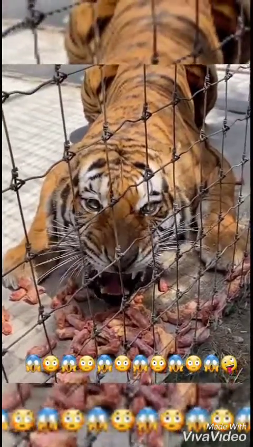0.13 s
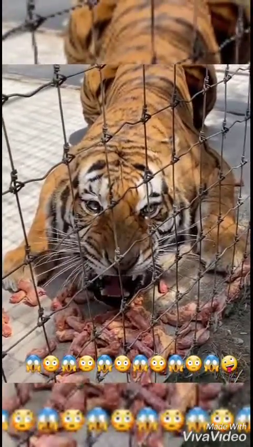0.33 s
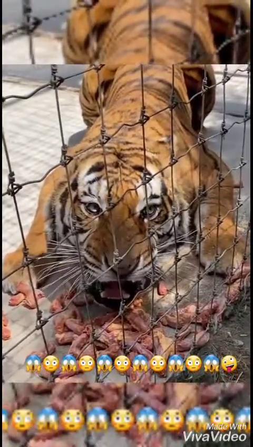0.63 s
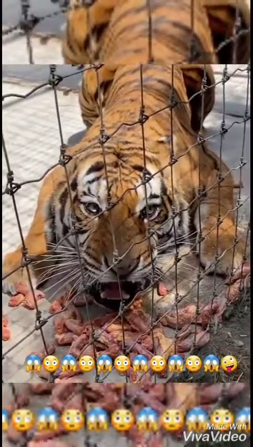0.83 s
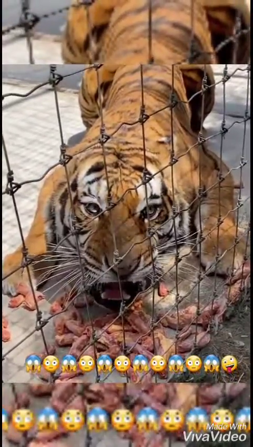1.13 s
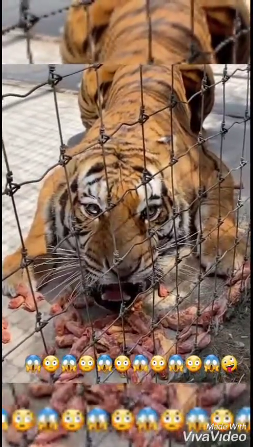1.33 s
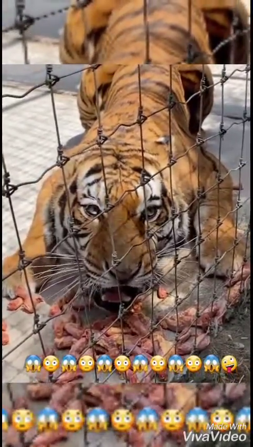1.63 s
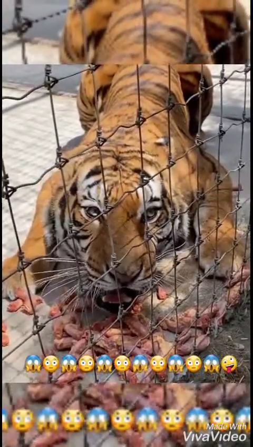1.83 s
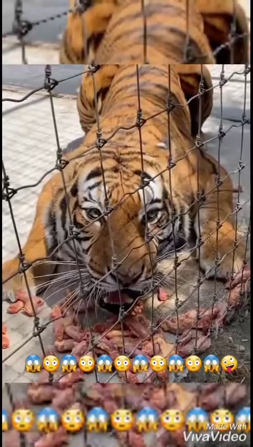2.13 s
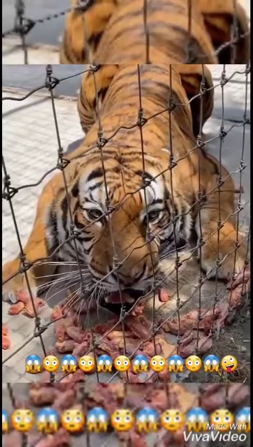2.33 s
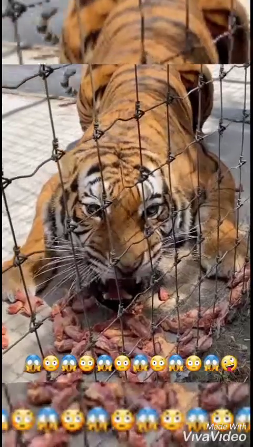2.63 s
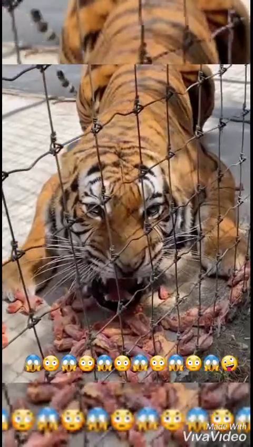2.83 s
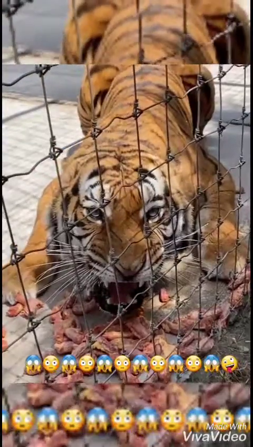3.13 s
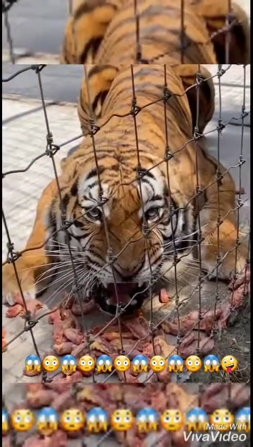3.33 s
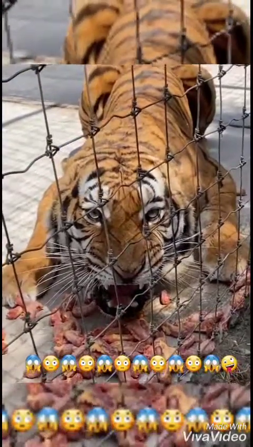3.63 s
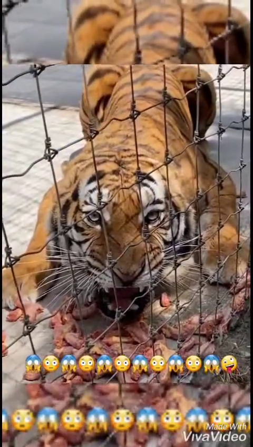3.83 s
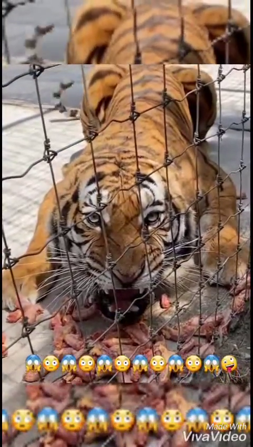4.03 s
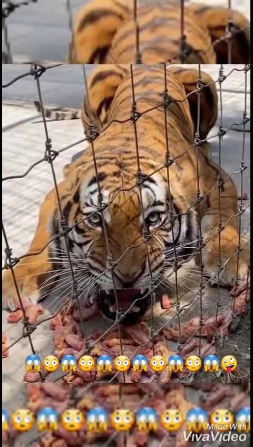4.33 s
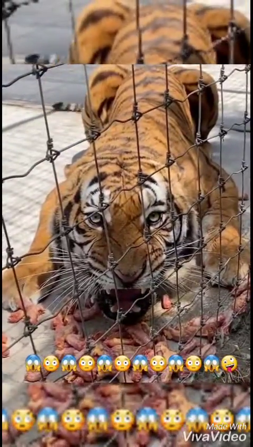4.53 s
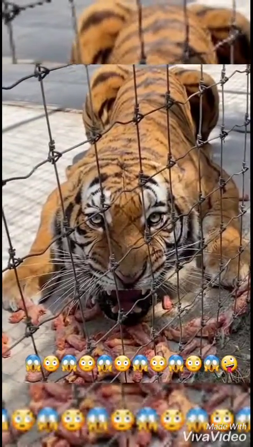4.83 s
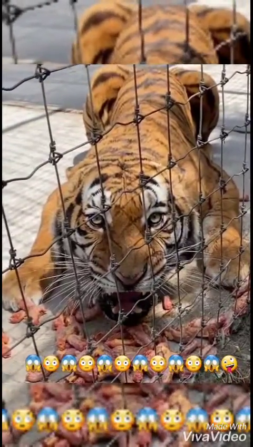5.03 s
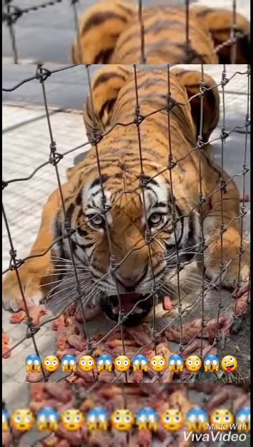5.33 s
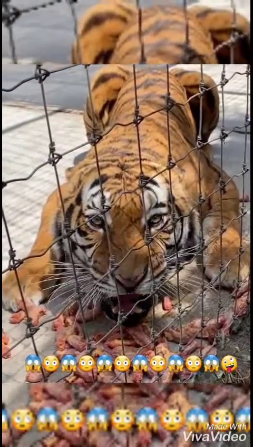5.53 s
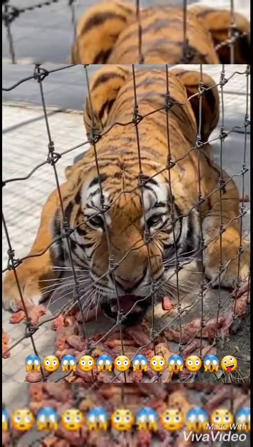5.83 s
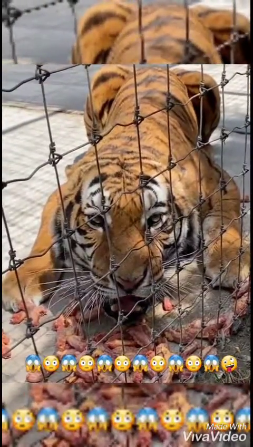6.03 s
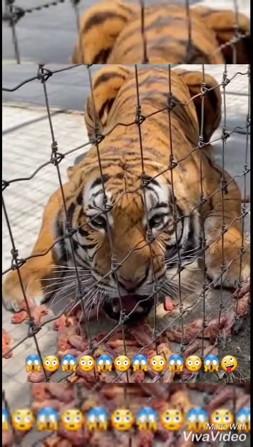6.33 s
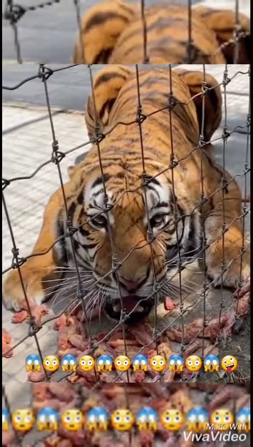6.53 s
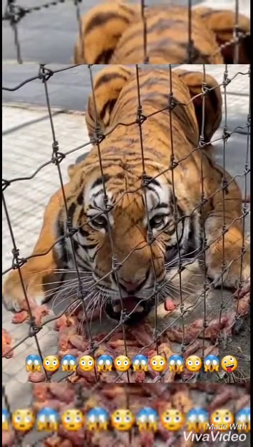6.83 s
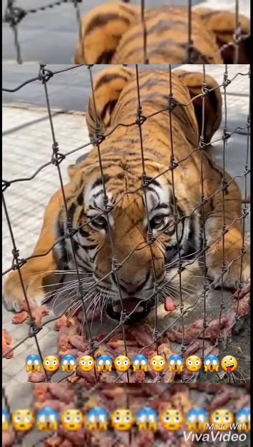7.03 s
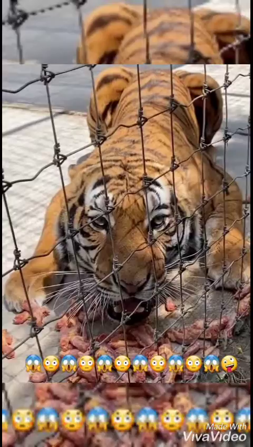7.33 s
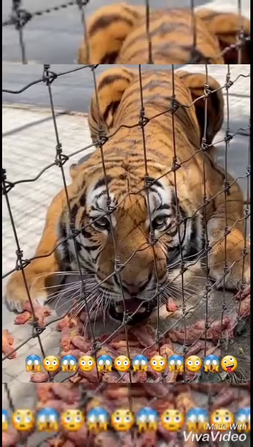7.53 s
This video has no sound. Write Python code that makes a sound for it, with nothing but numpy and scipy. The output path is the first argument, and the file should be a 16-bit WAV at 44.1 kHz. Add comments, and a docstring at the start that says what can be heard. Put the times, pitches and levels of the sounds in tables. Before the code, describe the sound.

A tiger is snarling close to the microphone in a quiet open-air enclosure, its voice rough and fluttering, with a chesty rumble and a rasp of air. The first snarl fades into soft croaks by about 1.7 seconds. A short growl at 1.8 seconds slows into a rattling run of throaty knocks. At 2.6 seconds a much louder snarl breaks out, peaks near 3 seconds and slowly sinks, ending in croaks and a faint moan around 5.3 seconds. A deep growl follows at 5.4 seconds and slows to knocks near 6 seconds. At 6.2 seconds the tiger roars with a hoarse moan on top, loudest around 6.6 seconds, then eases into a darker, softer rasp until about 7.7 seconds. A distant bird chirps very faintly in the lulls near 1.6 and 5 seconds.

```python
"""An open-air enclosure with a concrete floor: close to the microphone, behind a wire fence, a tiger
snarls over raw meat. Its heavy vocal folds flap about 20-60 times a second; each flap thumps the chest,
rings the throat and lets a puff of air rasp past the teeth. Effort and flap rate set loudness, roughness
and colour, and the jaws close as a snarl fades. Snarls run down into soft croaks, growls slow to single
knocks, and a hoarse moan rides on the final roar. Far off, a bird chirps faintly in the lulls."""
import sys
import numpy as np
from scipy import signal
from scipy.fft import rfft, irfft, next_fast_len
from scipy.io import wavfile
from scipy.ndimage import map_coordinates

SR = 44100
rng = np.random.default_rng(int(sys.argv[2]) if len(sys.argv) > 2 else 0)


def int16_out(signal):
    """Quantize to a 16-bit WAV file."""
    q = np.round(np.clip(np.atleast_2d(signal).T, -1, 1) * 32767)
    wavfile.write(sys.argv[1], SR, q.astype(np.int16))


N = 339112

# resonances of the tiger's airway: (centre [Hz], width [Hz], level [dB])
PHARYNX = [(159.6, 42.6, 0)]
SNARL_THROAT = [(266, 165, -3), (395, 150, -4), (514, 116, -5.5), (640, 120, -13), (705, 85, -5.5),
                (754, 33, -3.5), (912, 32.4, -6.5)]
GROWL_THROAT = [(260, 130, 0), (420, 155, 6.5), (730, 105, 4.5), (914, 19, -5)]
GROWL_MOUTH = [(1274, 260, -2), (1806, 420, -1), (1990, 240, -2), (2360, 270, -9), (2880, 610, -14.5),
               (3400, 700, -16), (5140, 2860, -28), (12600, 3300, -39.5)]

EASY_DB, EASY_RATE_HZ, EASY_ROUGH = -35, 35, .3  # effort, flap rate and roughness of an easy snarl


def snarls():
    """The tiger at close range: two long snarls and a roar, with a short growl ahead of the last two."""
    # gestures: (time [s], effort [dB], flap rate [Hz])
    first_snarl = [(0.0, -33, 41), (.45, -35.5, 36.1), (0.87, -38, 35.3), (1.298, -43.5, 29.8),
                   (1.388, -46.5, 27.1), (1.518, -45, 20.3), (1.8, -55.5, 21.4)]
    soft_growl = [(1.8, -44.5, 55.6), (1.898, -32.5, 55.84), (1.978, -40, 36.4), (2.1, -47.5, 29.26)]
    long_snarl = [(2.6, -44.5, 50.7), (2.71, -25, 44.4), (2.81, -22.5, 56.5), (2.92, -21, 56.7),
                  (3.06, -22.5, 52.5), (3.22, -25, 48.2), (3.52, -30.5, 41.6), (3.66, -28, 37.1),
                  (3.85, -31.5, 37.1), (4.4, -36, 32.9), (4.76, -44, 27), (5.2, -53, 22), (5.35, -71, 15)]
    deep_growl = [(5.411, -32, 66.73), (5.49, -27, 80.47), (5.56, -27.5, 56.4), (5.67, -30.5, 51.6),
                  (5.75, -25, 46.85), (5.84, -33, 40.64), (5.93, -32, 36.93)]
    roar = [(6.21, -38, 37.56), (6.296, -27.5, 45.65), (6.4, -21, 49.27), (6.558, -19, 37.01),
            (6.7, -21, 39.64), (6.86, -28, 39.58), (6.988, -33, 34.26), (7.482, -37, 33.1),
            (7.69, -39.5, 29.42)]
    out = np.zeros(N)
    # (gesture, teeth bared, offsets of chest [dB], boom [dB], rasp [dB], hiss [dB])
    for gesture, bared, *colour_db in [(first_snarl, True, 3, -1.9, -5, -15),
                                       (soft_growl, False, 5.5, -1, -.89, -56),
                                       (long_snarl, True, 4.16, -6.5, -4, -13.5),
                                       (deep_growl, False, 3.4, 1.9, -7.3, -28.5),
                                       (roar, True, 1.8, -1.8, -5, -19)]:
        add(out, gesture[0][0], outburst(gesture, bared, colour_db))
    return out


def outburst(gesture, bared, colour_db):
    """One snarl, growl or roar: the same flaps drive chest, pharynx, throat, mouth and a high hiss."""
    # resonances: (centre [Hz], width [Hz], level [dB])
    chest_modes = [(53.4, 29.4, 7), (88.7, 23, 2.5), (112.6, 41.4, 6.5)]
    hollow_throat = [(762.3, 43, 0)]
    clear_throat = [(283.3, 32, 3), (337, 53, 0), (400, 43, -3.5)]
    t = np.arange(int(gesture[0][0] * SR), min(N, int(gesture[-1][0] * SR))) / SR
    effort_db, rate = curves(gesture, t)
    rough, double = folds(effort_db, rate)
    chest_db, boom_db, throat_db, rasp_db, hiss_db = levels(t, effort_db, rough, bared, colour_db)
    locked = np.interp(rate, [43, 50], [0, 1])  # from 43 to 50 Hz the folds lock into a regular beat
    wash_db = np.interp(rate, [22.2, 26.6], [-5, 0])  # the steady voice drops as slow flaps come apart
    chaos = rough * (1 - .7 * locked)
    flaps = flap_train(t, rate, chaos, double, jitter=.14, scatter=.7)
    # each closure cuts the flow and leaves a dip in pressure; roughness trades it for turbulence
    deep = blend(-flaps, puffs(flaps, open_s=.006, linger_s=.008, leak=.6), .6 * chaos)
    voice = blend(-flaps, puffs(flaps, open_s=.0045, linger_s=.005, leak=.5), .3 + 1.1 * chaos)
    mouth = mouth_rasp(t, flaps, locked, rough, bared)
    hiss = amp(hiss_db) * high_hiss(flaps)
    ring = lambda source, modes: steady(through(source, cavity(modes)))
    chest = amp(chest_db + wash_db) * ring(deep, chest_modes)
    boom = amp(boom_db + wash_db / 2) * ring(deep, PHARYNX)
    throat = ring(voice, SNARL_THROAT if bared else GROWL_THROAT)
    softness = np.clip((-30 - throat_db) / 40, 0, .28)  # a soft voice brings out the hollow upper throat
    throat = wavering(blend(throat, ring(voice, hollow_throat), softness))
    if bared:  # regular flaps ring clean harmonics
        throat = blend(throat, ring(-flaps, clear_throat), .3 * locked)
    throat = amp(throat_db + wash_db) * throat
    rasp = amp(rasp_db + wash_db) * steady(wavering(mouth))
    fade = np.clip(np.minimum(t - t[0], t[-1] - t) / .00051, 0, 1)
    return fade * (chest + boom + throat + rasp + hiss)


def folds(effort_db, rate, rough_per_db=.04, rough_per_octave=.65, split_below_hz=48):
    """Effort that the flap rate cannot take up makes the folds rough; slow cycles grow a second flap."""
    strain = rough_per_db * (effort_db - EASY_DB)
    relief = rough_per_octave * np.log2(rate / EASY_RATE_HZ)
    double = 1 - rate / split_below_hz
    return np.clip([EASY_ROUGH + strain - relief, double], .1, 1)


def levels(t, effort_db, rough, bared, colour_db, jaws_open_db=-31.5, jaws_shut_db=-47):
    """Levels (dB) of chest, boom, throat, rasp and hiss as an outburst swells and the jaws close."""
    # chest to rasp respond to (effort [dB per dB], roughness [dB per unit], closed jaws [dB])
    chest_law = (1.1, -9, 2.7)
    boom_law = (0.99, 6.6, 3)
    throat_law = (0.99, 0, 1)
    rasp_law = (0.97, -0.83, -9)
    # the high hiss drops away in the loudest part of the roar:
    # (effort [dB per dB], drop [dB per unit], closed jaws [dB])
    hiss_law = (1.16, -29, -27.5)
    age = t - t[0]
    slack = np.interp(effort_db, [jaws_shut_db, jaws_open_db], [1, 0])
    closed = slack * age / age[-1] if bared else 0
    chest, boom, throat, rasp, hiss = [
        EASY_DB + grows * (effort_db - EASY_DB) + shift_db * (rough - EASY_ROUGH) + closed_db * closed
        for grows, shift_db, closed_db in (chest_law, boom_law, throat_law, rasp_law, hiss_law)]
    swell_db = 0 if bared else np.interp(age, [0, .1], [-30, 0])  # a growl swells in
    follow_db = .26 * swell_db
    chest_db, boom_db, rasp_db, hiss_db = colour_db
    return (chest + chest_db + swell_db, boom + boom_db + swell_db, throat + follow_db,
            rasp + rasp_db + follow_db, hiss + hiss_db + swell_db)


def flap_train(t, rate, rough, double, jitter, scatter):
    """One impulse per flap, uneven in time and size when rough; a second flap splits the cycle."""
    phase = np.cumsum(rate) / SR
    beats = np.arange(1, int(2 * phase[-1]) + 1)
    at = np.minimum(np.searchsorted(phase, beats / 2), len(t) - 1)
    luck = rng.uniform(-1, 1, (len(at), 2))
    size = np.where(beats % 2, 1, double[at]) * (1 + scatter * rough[at] * luck[:, 0])
    when = at + SR * jitter * rough[at] * luck[:, 1] / rate[at]
    power = rate[at] * (1 + double[at] ** 2)  # faster flaps share the same air
    return np.bincount(np.clip(when, 0, len(t) - 1).astype(int), size / np.sqrt(power), len(t))


def airflow(t, open_s, linger_s):
    """Flow through one opening of the folds at t = 0: a round rise and fall."""
    return np.exp(-.5 * (t / np.where(t < 0, open_s, linger_s)) ** 2)


def puffs(flaps, open_s, linger_s, leak):
    """Turbulent air let through in a puff at every flap, over a steady leak."""
    t = np.arange(-(SR // 20), SR // 20) / SR
    flow = unit(signal.fftconvolve(flaps, airflow(t, open_s, linger_s), "same"))
    return unit((flow + leak) * rng.standard_normal(len(flaps)))


def mouth_rasp(t, flaps, locked, rough, bared):
    """A narrow mouth clicks dully; a bared one hisses brightly and darkens as the lips come forward."""
    # resonances: (centre [Hz], width [Hz], level [dB])
    wide_mouth = [(1354, 116, 0.5), (1747, 474, -0.5), (1991, 212, 3), (2405, 270, -8.5), (2974, 275, -2.5),
                  (3376, 205, 1.5), (3639, 265, -2), (4450, 173, -6), (5100, 900, -10.5)]
    pursed_mouth = [(1235, 220, -1.5), (1570, 460, -6.5), (1990, 270, 4), (2385, 226, 1), (3577, 440, -1.5),
                    (4260, 230, -6.5), (5640, 770, -12.5), (7080, 730, -17.5)]
    # lips pushed forward: (time [s], share [0-1])
    pursing = [(6.3, 0.18), (6.8, 0.67), (7.0, 0.94)]
    snaps = wet_cracks(flaps, locked)
    if not bared:
        return ring_mouth(flaps, snaps, locked, GROWL_MOUTH, open_s=.0038, leak=.19)
    wide, pursed = [ring_mouth(flaps, snaps, locked, modes, open_s=.0047, leak=.08 + .7 * rough)
                    for modes in (wide_mouth, pursed_mouth)]
    return blend(wide, pursed, curves(pursing, t)[0])


def ring_mouth(flaps, snaps, locked, modes, open_s, leak):
    """Puffs and cracks ring the mouth; wet lips and tongue shift, so each flap favours other modes."""
    uneven = lambda blows: blows * rng.uniform(.4, 1, len(blows))
    out = 0
    for group in (modes[k::3] for k in range(3)):
        breath = puffs(uneven(flaps), open_s, open_s, leak)
        crackle = puffs(uneven(snaps), open_s=.001, linger_s=.002, leak=0)
        air = blend(breath, crackle, share=.24 * (1 + locked))
        out += amp(max(db for hz, width, db in group)) * through(air, cavity(group))
    return out


def wet_cracks(flaps, locked, stray_s=.0085):
    """Two cracks per flap: one sharp snap when the folds are locked, a ragged pair when they are slack."""
    at = np.repeat(np.flatnonzero(flaps), 2)
    when = at + SR * stray_s * (1 - locked[at]) * rng.uniform(-1, 1, len(at))
    size = flaps[at] / np.sqrt(1 + locked[at])
    return np.bincount(np.clip(when, 0, len(flaps) - 1).astype(int), size, len(flaps))


def high_hiss(flaps):
    """A high, flickering hiss that pulses with the flaps."""
    # (frequency [Hz], level [dB])
    spectrum = [(3500, 1), (5800, 2), (13000, -0.5), (16000, -22)]
    flicker = puffs(flaps * rng.uniform(.014, 1, len(flaps)), open_s=.0028, linger_s=.004, leak=.017)
    return unit(through(flicker, along(spectrum)))


def wavering(x, depth=.018, rate_hz=14):
    """Tongue and jaws keep moving, so all the resonances waver together in pitch."""
    lead = wobble(len(x), rate_hz) * depth * SR / (2 * rate_hz)
    return map_coordinates(x, [np.arange(len(x)) + lead], mode="nearest")


def knocks():
    """A growl slowed to single flaps: a rasping click, a throat ring, a thud from pharynx and chest."""
    # (time [s], throat [dB], throat pitch [Hz], thud [dB], rasp [dB]), levels before each part's trim
    single_flaps = [(2.076, -30, 381, -31, -42), (2.112, -22, 398, -25, -28.5), (2.145, -30, 400, -26, -32),
                    (2.18, -21.5, 390, -18.5, -33), (2.224, -22.5, 433, -21, -32.5),
                    (2.263, -26.5, 423, -24, -30), (2.306, -23.5, 357, -21, -27.5),
                    (2.344, -23.5, 402, -22.5, -28.5), (2.381, -18.5, 407, -19, -29.5),
                    (2.422, -27, 330, -21, -32), (2.463, -20, 400, -19.5, -32),
                    (2.5, -26.5, 420, -18, -30.5), (2.54, -18.5, 350, -20, -35),
                    (5.936, -27.5, 406, -19, -26.5), (5.966, -22.5, 350, -25.5, -28),
                    (6.0, -26.5, 412, -30, -31), (6.043, -24.5, 402, -24, -37),
                    (6.09, -28, 500, -22.5, -37), (6.131, -24, 430, -26, -39)]
    # pharynx and chest: (centre [Hz], width [Hz], level [dB])
    thud_modes = [(173.5, 54, 1.5), (66, 36, 2)]
    out, t = np.zeros(N), np.arange(SR // 8) / SR - .02
    blow = lambda delay: 1.0 * (np.arange(len(t)) == np.searchsorted(t, delay))
    flow = airflow(t - .005, open_s=.0028, linger_s=.0045) + .12 * airflow(t, open_s=.012, linger_s=.025)
    for s, throat_db, throat_hz, thud_db, rasp_db in single_flaps:
        air = flow * rng.standard_normal((3, len(t)))
        lag, tuning = rng.uniform(.6, 1.4), rng.uniform(.8, 1.2)  # no two closures are alike
        rasp = amp(rasp_db - 15.5) * resonate(air[0], GROWL_MOUTH)
        ring = amp(throat_db - 17) * resonate(blow(.00212), [(throat_hz, 150, 0)])
        ragged = amp(throat_db - 16.5) * resonate(air[1], GROWL_THROAT)
        body = [(hz * tuning, width, db) for hz, width, db in thud_modes]
        thud = amp(thud_db - 11) * resonate(blend(blow(.00782 * lag), air[2], .46), body)
        add(out, s + t[0], rasp + ring + ragged + thud)
    return out


def moans(roughness=.45):
    """A second, hoarse voice bends in pitch over the end of the long snarl and through the roar."""
    # one list per moan: (time [s], pitch [Hz], level [dB])
    gestures = [
        [(4.42, 163, -44), (4.8, 138.4, -44), (5.3, 179.8, -44)],
        [(6.33, 173.3, -35), (6.51, 164.1, -24), (6.7, 178.3, -22), (6.83, 176.6, -34), (7.1, 178, -35)],
    ]
    out = np.zeros(N)
    for gesture in gestures:
        t = np.arange(int(gesture[0][0] * SR), int(gesture[-1][0] * SR)) / SR
        hz, db = curves(gesture, t)
        flutter = 1 + roughness * (wobble(len(t), EASY_RATE_HZ) + 1j * wobble(len(t), EASY_RATE_HZ))
        tone = unit(np.real(flutter * np.exp(2j * np.pi * np.cumsum(hz) / SR)))
        add(out, t[0], amp(db) * signal.windows.tukey(len(t), .1) * tone)
    return out


def grunts():
    """Now and then one resonance of throat or mouth sounds alone, hoarse and sagging a little."""
    # (time [s], pitch [Hz], relative level [dB], length [s])
    hollow_rings = [(.86, 171.8, -30, 0.19), (1.796, 755, -33.5, 0.035), (2.122, 153, -19, .032),
                    (3.653, 508, -25, 0.078), (5.413, 760.6, -26, 0.042), (5.525, 170.6, -15.5, .1),
                    (5.763, 445, -16, 0.02), (6.041, 1947, -22.5, .0063), (6.088, 1850, -24, 0.012),
                    (6.586, 1955, -20, 0.0086)]
    out = np.zeros(N)
    for s, hz, db, length in hollow_rings:
        tone = glide(hz * 1.03, hz * .97, length)
        hoarse = np.hanning(len(tone)) * resonate(rng.standard_normal(len(tone)), [(hz, hz / 5, 0)])
        add(out, s, amp(db) / 2 * blend(tone, hoarse, .42))
    return out


def croaks(gap_s=.0215, second_db=-7.5):
    """As a snarl runs down, slack folds open twice in a row, puffing through throat, mouth and pharynx."""
    # (time [s], relative level [dB])
    double_flaps = [(1.44, -42.5), (1.512, -44.5), (1.561, -44.5), (1.608, -43.5), (1.66, -47),
                    (4.848, -41.5), (4.884, -43.5), (4.931, -53), (4.973, -46), (5.022, -44.5),
                    (5.071, -45), (5.121, -42), (5.166, -44.5), (5.219, -46), (5.279, -48)]
    out, t = np.zeros(N), np.arange(SR // 8) / SR - .02
    puff = lambda delay: airflow(t - delay, open_s=.0014, linger_s=.0034)
    for s, db in double_flaps:
        air = (puff(.0022) + amp(second_db) * puff(gap_s)) * rng.standard_normal((2, len(t)))
        throat = amp(-9.5) * resonate(air[0], SNARL_THROAT)
        rasp = amp(-20) * resonate(air[1], GROWL_MOUTH)
        thud = amp(-8) * resonate(air[0], PHARYNX)
        add(out, s + t[0], amp(db) * (throat + rasp + thud))
    return out


def enclosure(x, t60, wet_db):
    """A short, weak answer from the concrete floor and the walls; the bass escapes through the fence."""
    t = np.arange(SR // 3) / SR
    tail = rng.standard_normal(len(t)) * amp(-60 * t / t60) * (t > .003)
    tail = signal.sosfilt(signal.butter(2, 700, "high", fs=SR, output="sos"), tail)
    return x + amp(wet_db) * signal.fftconvolve(x, tail / np.linalg.norm(tail))[:N]


def far_bird():
    """Faint falling chirps, a long way from the microphone."""
    # (time [s], peak level [dB])
    chirps = [(1.61, -59), (4.938, -59), (5.066, -60), (5.235, -64), (5.335, -68)]
    out = np.zeros(N)
    for s, db in chirps:
        add(out, s, amp(db) * glide(start_hz=4900, end_hz=3850, length=.024))
    return out


def open_air():
    """The quiet air around the enclosure: a low rumble with a trace of hiss."""
    # (frequency [Hz], relative level [dB])
    spectrum = [(20, -21), (60, -2), (130, 0.5), (260, -9), (2800, -31), (4300, -25.5), (7500, -52)]
    return amp(-53) * unit(through(rng.standard_normal(N), along(spectrum)))


def amp(db):
    """Decibels as amplitude."""
    return 10 ** (np.asarray(db) / 20)


def unit(x):
    """x at rms 1."""
    return x / np.sqrt(np.mean(x ** 2) + 1e-20)


def steady(x, span_s=.19):
    """x near rms 1, its power held even from one group of flaps to the next."""
    window = np.hanning(int(span_s * SR))
    power = np.abs(signal.fftconvolve(x ** 2, window / window.sum(), "same"))
    return x / np.sqrt(power + np.mean(x ** 2) / 20)


def blend(first, second, share):
    """Mix two sounds, giving the second this share of the power."""
    share = np.clip(share, 0, 1)
    return np.sqrt(1 - share) * unit(first) + np.sqrt(share) * unit(second)


def add(track, s, sound):
    """Lay a sound into the track at time s."""
    part = track[max(0, int(s * SR)):][:len(sound)]
    part += sound[:len(part)]


def curves(rows, t):
    """Each column after the time, read at the times t."""
    s, *cols = np.transpose(rows)
    return [np.interp(t, s, c) for c in cols]


def wobble(size, rate_hz):
    """A smooth random curve with so many moves a second."""
    knots = rng.standard_normal(int(size * rate_hz / SR) + 4)
    return map_coordinates(knots, [np.arange(size) * rate_hz / SR])


def glide(start_hz, end_hz, length):
    """A short swelling tone that slides in pitch."""
    u = np.linspace(0, 1, int(length * SR))
    return np.sin(np.pi * u) * np.sin(2 * np.pi * np.cumsum(start_hz + (end_hz - start_hz) * u) / SR)


def along(points):
    """Gain of (frequency [Hz], level [dB]) points joined on a log axis."""
    f, db = np.transpose(points)
    return lambda hz: amp(np.interp(np.log(hz + 1), np.log(f), db))


def cavity(modes):
    """Gain of a set of steep-sided resonances, summed in power."""
    peak = lambda hz, centre, width: (hz * width) ** 2 / ((centre ** 2 - hz ** 2) ** 2 + (hz * width) ** 2)
    return lambda hz: np.sqrt(sum((amp(db) * peak(hz, centre, width)) ** 2 for centre, width, db in modes))


def through(x, gain):
    """x through the causal filter with this gain, so that it rings after each blow."""
    size = 2 * next_fast_len(len(x) // 2 + 4096)
    response = gain(np.fft.rfftfreq(size, 1 / SR))
    cepstrum = irfft(np.log(np.maximum(response / response.max(), 1e-4)))
    cepstrum[1:size // 2] *= 2  # fold onto positive time: minimum phase
    cepstrum[size // 2 + 1:] = 0
    return irfft(rfft(x, size) * np.exp(rfft(cepstrum)), size)[:len(x)]


def resonate(x, modes):
    """x ringing a cavity, at rms 1."""
    return unit(through(x, cavity(modes)))


def scene():
    """The tiger close up in its enclosure; open air and the bird lie behind it."""
    tiger = snarls() + knocks() + croaks() + grunts() + moans()
    return (enclosure(tiger, t60=.092, wet_db=-10) + far_bird() + open_air())[None]


def record(dry, top_hz=13250):
    """A mono phone microphone outside the fence keeps nothing above its band limit."""
    hz = np.fft.rfftfreq(N, 1 / SR)
    return irfft(rfft(dry) / (1 + (hz / top_hz) ** 120), N)


dry = scene()
out = record(dry)
int16_out(out)
```